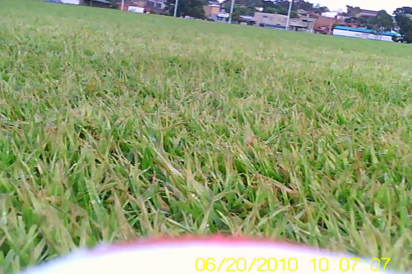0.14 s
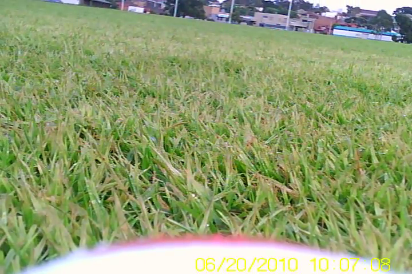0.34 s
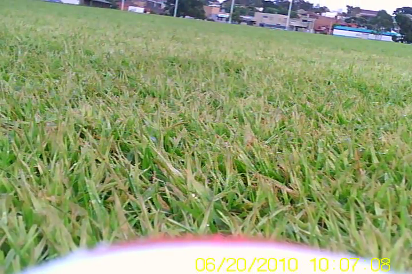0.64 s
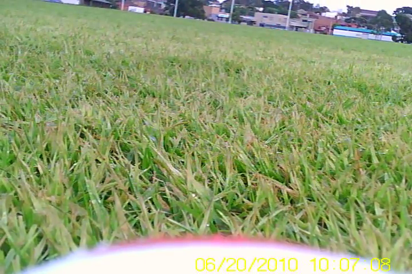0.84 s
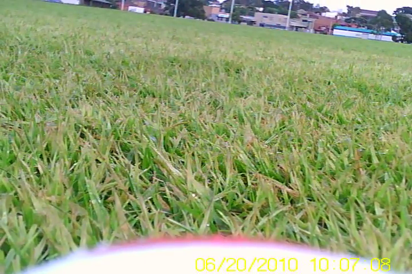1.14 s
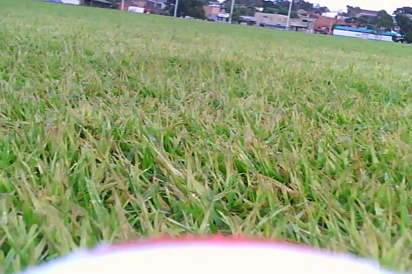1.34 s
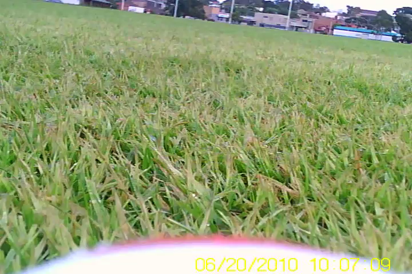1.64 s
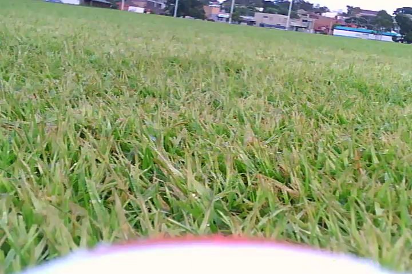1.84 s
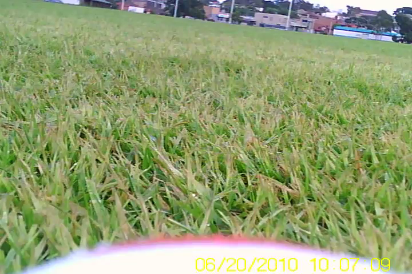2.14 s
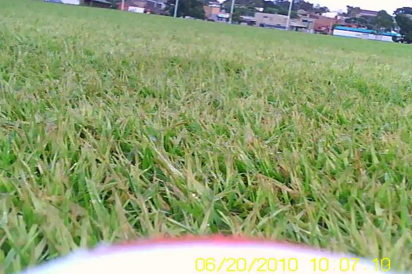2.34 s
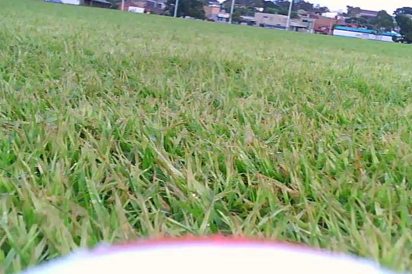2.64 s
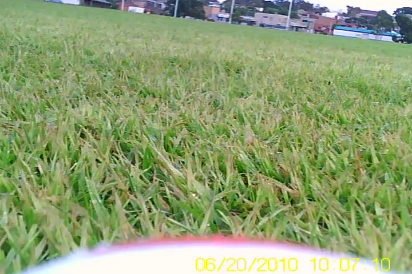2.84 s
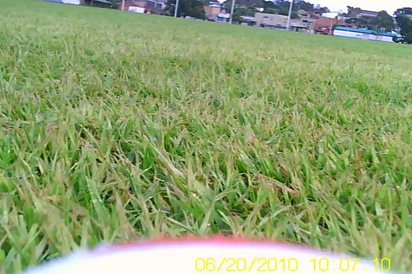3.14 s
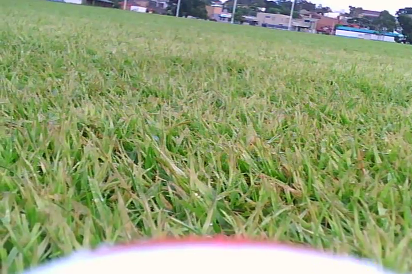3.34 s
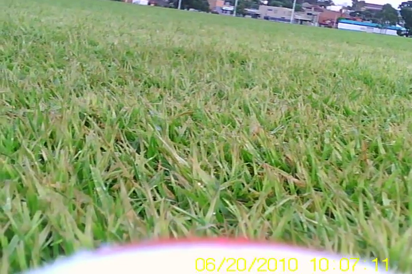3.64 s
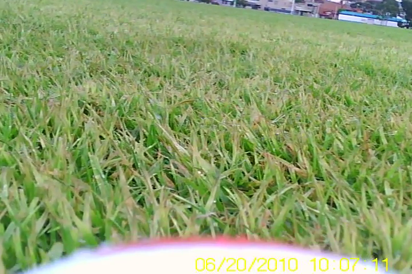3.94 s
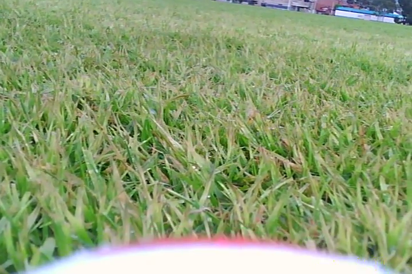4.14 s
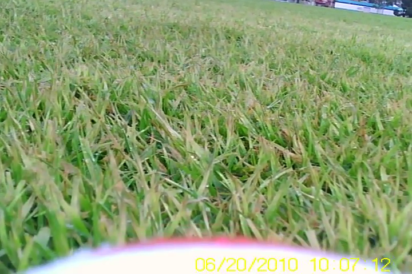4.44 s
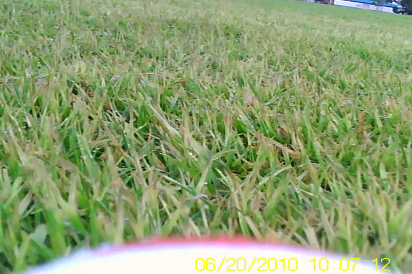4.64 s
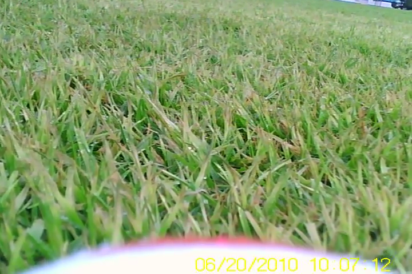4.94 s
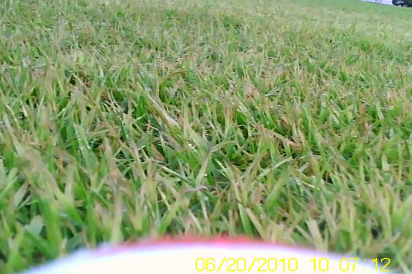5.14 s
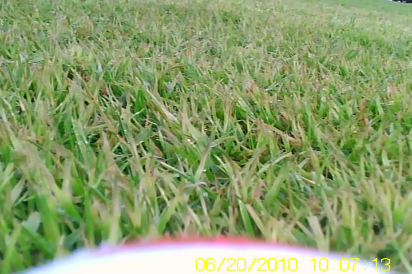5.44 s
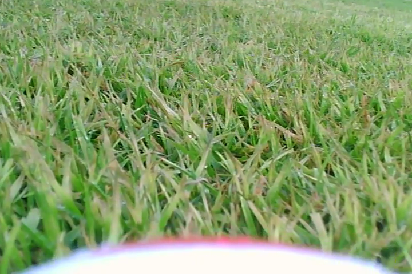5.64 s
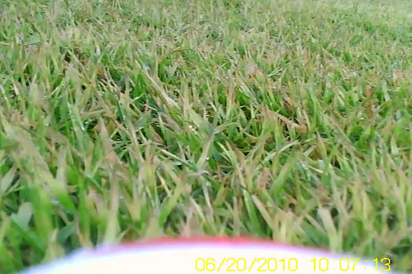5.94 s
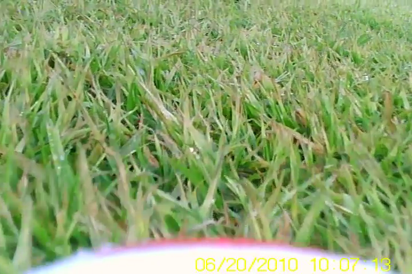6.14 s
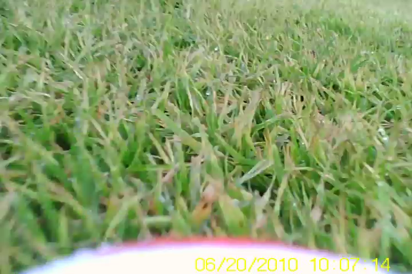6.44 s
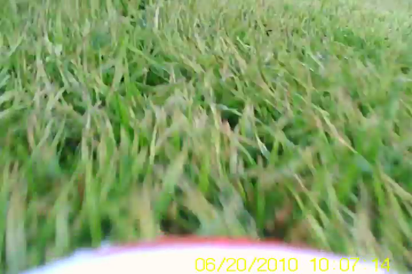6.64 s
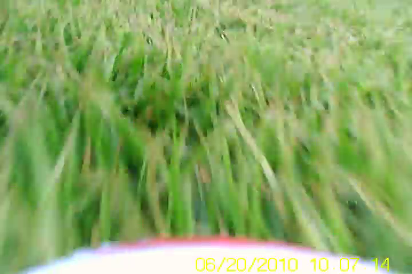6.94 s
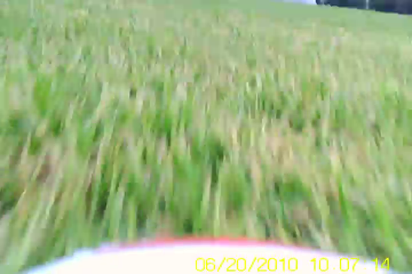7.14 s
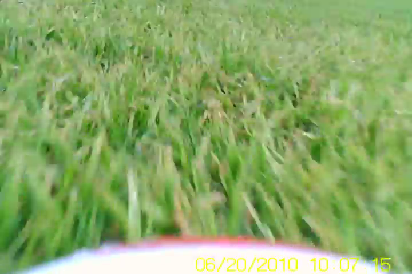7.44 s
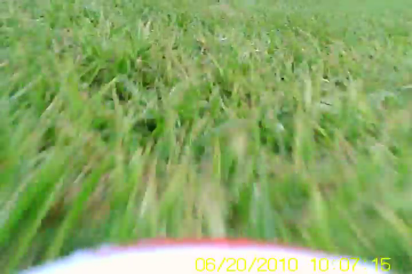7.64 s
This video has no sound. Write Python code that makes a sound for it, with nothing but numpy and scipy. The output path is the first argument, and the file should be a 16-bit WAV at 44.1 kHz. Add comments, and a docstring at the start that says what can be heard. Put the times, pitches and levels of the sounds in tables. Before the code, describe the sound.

Heard from on board a small electric model plane on a grass field: over a low rumble, servos zip and twitch in short whirrs for two seconds. After a quiet gap, the motor knocks, stutters and whines rapidly upward. The propeller builds to a hard, buzzing drone with hiss and thin high whistle, then wavers and rattles as the plane rolls off.

```python
"""A small electric model plane stands on grass, heard from on board, over a low steady rumble.
First its servos whirr and twitch as the controls are tried: gear clicks, brush rub and pinion whine.
Then the brushless motor kicks, ringing its mount, stutters and spins up with a ragged magnet whine.
The propeller's shaft orders drone through the foam airframe under the controller's thin whistle;
hiss and rattle follow the rotor, and the tones waver more as the plane rolls off."""
import sys
import numpy as np
from scipy import signal
from scipy.fft import rfft, irfft, next_fast_len
from scipy.io import wavfile

SR = 44100
rng = np.random.default_rng(int(sys.argv[2]) if len(sys.argv) > 2 else 0)


def dump(signal):
    """Clip the signal to [-1, 1] and save it as 16-bit WAV at the path in sys.argv[1]."""
    limited = np.clip(np.atleast_2d(signal).T, -1, 1)
    pcm = np.round(limited * 32767).astype(np.int16)
    wavfile.write(sys.argv[1], SR, pcm)


N = 343098
TIME = np.arange(N) / SR

# Rumble spectrum, relative: [f/Hz, level/dB]
RUMBLE_SPECTRUM = [(12, -32), (20, 4), (28, -1.5), (60, -1), (105, -5), (127, -11.5), (170, -11.5),
                   (200, -17), (380, -21), (434, -24), (471, -23), (3150, -38), (8940, -40.5), (9950, -43),
                   (12000, -63), (15600, -96), (22000, -120)]
RUMBLE_DB = -46
CUTOFF_HZ = 12200

# Servo sweeps, relative: [start t/s, end t/s, drive level/dB, gear growl level/dB, servo 0 or 1]
SERVO_SWEEPS = [(0.088, 0.194, -35, -62, 0), (0.242, 0.337, -33.5, -40.5, 0),
                (.405, 0.531, -33.5, -39.5, 0), (0.573, 0.68, -33.5, -34.5, 0), (0.793, 0.891, -36, -51, 0),
                (0.965, 1.059, -37.5, -47.5, 0), (1.165, 1.256, -37.5, -53, 0),
                (1.366, 1.439, -35.5, -47, 0), (1.762, 1.84, -37.5, -69.5, 1), (1.915, 1.991, -33, -72, 1)]
# Hardest single servo kicks, relative: [t/s, level/dB]
SERVO_TWITCHES = [(0.0947, -31), (0.2229, -32), (0.2743, -33), (0.397, -30), (0.4279, -29), (0.6835, -31.5),
                  (0.7981, -33), (0.9747, -37), (1.0326, -27), (1.2984, -34), (1.3718, -36), (1.61, -31),
                  (1.7447, -26), (1.7901, -24.5), (1.8105, -25.5), (1.8964, -29), (1.926, -25),
                  (1.9789, -23.5)]
# Servo hunts for its position, one small kick per radio frame: [start t/s, end t/s, mean level/dB]
SERVO_HUNTS = [(0.0, 0.075, -38.5), (0.196, 0.21, -38.5), (0.554, 0.56, -31), (0.766, 0.78, -35),
               (0.929, 0.96, -39), (1.074, 1.13, -42), (1.32, 1.35, -38), (1.449, 1.48, -40),
               (1.631, 1.73, -33), (1.826, 1.88, -35), (2.002, 2.055, -38.5), (2.111, 2.165, -41.5),
               (2.751, 2.805, -36)]
FRAME_S, HUNT_SCATTER_DB = .0223, 4
SECOND_SERVO_S = 1.55   # later kicks belong to servo 1
# Servo and gear growl spectra, relative: [f/Hz, level/dB]
FIRST_SERVO_SPECTRUM = [(250, -23), (720, -16), (1050, -9), (1450, -5.5), (1690, -1), (1950, -16.5),
                        (2750, -15), (3100, -26.5), (4300, -15), (5200, -21), (6200, -13.5), (7000, -23),
                        (9300, -21.5), (11200, -66)]
SECOND_SERVO_SPECTRUM = [(600, -30), (1200, -13.5), (1500, 6.5), (1750, -7), (2000, -8.5), (2750, -6.5),
                         (3200, -23.5), (5000, -16), (8000, -26.5), (9500, -34), (12000, -58)]
GROWL_SPECTRUM = [(130, -25), (220, -9.5), (330, -6.5), (420, 4.5), (560, -12), (750, -15), (1020, -0.5),
                  (1400, 2), (2000, -41)]
# Servo gear squeak as it runs down, mean course: [t/s, f/Hz, level/dB]
GEAR_SQUEAK = [(.47, 3800, -80), (.485, 3450, -57), (.5, 3150, -57), (.52, 2400, -47), (.531, 2090, -43),
               (.538, 1955, -80)]

# Starting jolts of the rotor, knock relative: [t/s, knock level/dB, switching tone level/dB]
ROTOR_JOLTS = [(2.8677, -14, -43), (2.884, -25, -70), (2.9075, -39, -56), (2.931, -21, -31),
               (2.941, -20, -33), (2.949, -19, -32), (2.955, -18.5, -39), (2.9595, -21, -38),
               (3.013, -17, -60), (3.035, -9, -60), (3.079, -10, -60)]
# Ringing of the soft motor mount, relative: [f/Hz, level/dB, t60/s]
MOUNT_RINGS = [(564, -13, 0.025), (900, -3, 0.028), (1016, -4, 0.024), (1440, -12, 0.017),
               (2060, -15, 0.013), (2650, -17, 0.022), (3450, -13, .008), (6300, -18, 0.01)]

# Rotor speed before snags and jitter: [t/s, speed/(turns/s)]
ROTOR_SPEED = [(2.93, 10), (3.02, 44), (3.07, 73), (3.13, 110.0), (3.15, 120.0), (3.21, 139.4),
               (3.32, 162.6), (3.54, 184.3), (3.67, 206.8), (3.76, 214.7), (3.95, 215.2), (4.05, 222.3),
               (4.24, 241.3), (4.55, 242.7), (4.74, 256.3), (5.23, 256.3), (5.43, 270.1), (5.59, 275.0),
               (5.68, 286.9), (5.82, 293.1), (6.19, 295.3), (6.6, 292.8), (6.81, 276.2), (6.92, 273.2),
               (6.99, 275.7), (7.35, 271.7), (7.48, 287.2), (7.68, 286.2), (7.78, 288.9)]
# Grass blades catch the propeller and brake it: [t/s, speed loss/(turns/s)]
GRASS_SNAGS = [(5.735, 1.94), (6.09, 4.9), (6.43, 1.83), (6.645, 1.7)]
SNAG_S = 0.02207
CRUISE_TURNS_PER_S = 280   # reference speed of the laws
ROLL_START_S, ROLL_BUILD_S = 5.3, 1.2   # wheels start to bump over the grass
SPEED_JITTER_STANDING, SPEED_JITTER_ROLLING = 0.001405, 0.00368   # share of speed
# Easing of the motor sounds as the plane gets rolling; each layer takes a share: [t/s, level/dB]
ROLL_EASING = [(5.56, 1), (5.64, -2.5), (6.0, -5.5), (6.6, -6.5), (6.8, -8), (7.25, -10), (7.5, -8),
               (7.78, -9.5)]
# Layer laws: [level at cruise/dB, slope/(dB per octave of speed), share of easing/1]
HISS_LAW = (-25, 16.3, 0.99)
BUZZ_LAW = (-27.5, 14.9, 0.39)
RATTLE_LAW = (-30, 7.4, 0.33)

# Hiss and airframe rattle spectra, relative: [f/Hz, level/dB]
HISS_SPECTRUM = [(300, -18), (1000, -4.5), (2500, 1), (3600, -0.5), (4300, 1), (5100, -2.5), (6200, 0),
                 (6600, -5.5), (7400, -0.5), (8000, -7), (8550, -14), (9900, -10), (11000, -15),
                 (12100, -33)]
RATTLE_SPECTRUM = [(150, -29.5), (330, -15.5), (480, -5), (620, -14), (790, -2.5), (1150, -7), (1600, 2),
                   (2200, 0.5), (2500, -5.5), (2780, -5.5), (3200, -22.5), (6000, -43.5)]
STUTTER_DB, STUTTER_END_S, STUTTER_FADE_DB_PER_S = -29, 3.14, 35   # rattle until rotor is in step
# Spells of mount rocking: [start t/s, end t/s, wobble level/dB, rattle level/dB]
ROCKING_SPELLS = [(5.42, 5.66, -34, -27), (6.679, 7.4, -41.5, -37.5), (7.377, 7.9, -43, -31)]
ROCK_RAMP_S = 0.042

# Switching tone: starts sharp and settles, weakens near full throttle
WHISTLE_HZ, WHISTLE_SHARP_HZ, WHISTLE_SETTLE_S = 8066, 125, .45
WHISTLE_DB, WHISTLE_EASING_SHARE = -31.5, 0.78   # before the full-throttle weakening
FULL_TURNS_PER_S, WHISTLE_FADE_TURNS_PER_S = 294.5, 25.6

# Fourteen magnets passing the coils, sidebands from rotor runout: [shaft order/1, relative level/dB]
MAGNET_ORDERS = [(10, -23), (11, -13.5), (12, -22), (13, -1), (14, 0), (15, -29), (16, -13.5), (18, -20),
                 (22, -21), (24, -12), (26, -7), (28, -9), (31, -16), (36, -6.5), (42, -6)]
# Course of the magnet whine, relative: [t/s, level/dB]
MAGNET_LEVEL = [(2.99, -47), (3.015, -27.5), (3.07, -14), (3.09, -22.5), (3.18, -16), (3.38, -17.5),
                (3.47, -21), (4.2, -23.5), (4.7, -50)]
# Gain of the motor mount for the magnet whine: [f/Hz, level/dB]
MOUNT_GAIN = [(300, -8), (600, -1), (900, -4), (1300, 3), (1700, -3.5), (2180, 3.5), (2380, -13.5),
              (2780, -6.5), (3100, -31), (3700, -30), (5000, -55)]
COG_ROUGH_DB, COG_SETTLE_S = 6.5, 0.23   # ragged at first, then smoother

# Propeller tones before body gain: [shaft order/1, level at cruise/dB, slope/(dB per octave), flutter factor/1]
BLADE_TONES = [(1, -29.3, 3.5, 1.22), (2, -10.5, 26, 0.85), (4, -21.5, 10.5, 1.43), (6, -28.5, 13.5, 0.87),
               (8, -33.5, 14.5, 2.33)]
BLADE_EASING_SHARE = 0.46
# Wing and fuselage resonances for the propeller tones: [f/Hz, level/dB]
BODY_GAIN = [(120, -6), (205, 2.5), (240, -1.0), (290, -1.8), (430, -6), (485, -15.5), (515, -7.5),
             (590, -8), (690, 4.8), (830, -5), (880, -1), (1150, -1.1), (1300, -2.5), (1450, 3.5),
             (1550, 10.5), (1700, 15.5), (2050, 13), (2300, 3.1)]
# Sharp edge of each blade pass: [shaft order/1, relative level/dB]
BLADE_EDGE_ORDERS = [(12, 0.5), (14, 0.5), (16, -1), (18, -4.5), (20, -4), (22, -9), (24, -11), (26, -13),
                     (28, -10)]
# Course of the blade edge, relative: [t/s, level/dB]
EDGE_LEVEL = [(3.3, -68), (3.8, -48), (4.2, -40.5), (5.3, -43), (6.5, -47), (7.2, -42.5), (7.48, -38.5),
              (7.78, -41)]
# Radiation of the blade edge: [f/Hz, level/dB]
EDGE_GAIN = [(2500, -8), (3300, 0.5), (3650, -1.5), (4050, 2.5), (4500, -4), (5000, -4.5), (8000, 0)]
# Weaker shaft orders: [shaft order/1, relative level/dB]
SHAFT_BUZZ_ORDERS = [(3, 4.5), (5, -0.5), (7, -4), (9, -4), (10, 0.5), (11, -12), (12, 3), (13, -1),
                     (15, -16), (17, -7)]
# Airframe gain for the buzz: [f/Hz, level/dB]
AIRFRAME_GAIN = [(300, -6), (600, -1.5), (900, -8), (1300, -1.5), (1700, 2.5), (2180, 1.5), (2380, -9.5),
                 (2780, -8), (3100, -22.5), (4200, -21), (6000, -32), (8000, -23), (9000, -40)]
# Half orders, mount rocking once in two turns: [shaft order/1, relative level/dB]
HALF_ORDERS = [(.5, -11.5), (1.5, -8), (2.5, 1.5), (3.5, -1), (4.5, -1.5), (5.5, 2), (6.5, -19)]
FLUTTER_STANDING, FLUTTER_ROLLING = 0.072, .15   # share of tone level, before each flutter factor
BUZZ_FLUTTER_STANDING, BUZZ_FLUTTER_ROLLING = 0.31, 0.52


def from_db(db):
    """Decibels to gain."""
    return 10 ** (np.asarray(db) / 20)


def rms_one(x):
    """Scale to unit power."""
    return x / np.sqrt(np.mean(x ** 2) + 1e-20)


def in_time(rows):
    """Each column of a curve table, interpolated per sample."""
    s, *columns = np.transpose(rows)
    return [np.interp(TIME, s, c) for c in columns]


def at_hz(points, hz):
    """Gain of a spectrum at the given frequencies, linear in dB over log f."""
    freqs, db = np.transpose(points)
    return from_db(np.interp(np.log(np.maximum(hz, 1)), np.log(freqs), db))


def fade_in(start_s, length_s):
    """Linear ramp, 0 to 1."""
    return np.clip((TIME - start_s) / length_s, 0, 1)


def drift(rate_hz):
    """Smooth random signal of spread 1, changing about rate_hz times a second."""
    pole = np.exp(-40 * np.pi * rate_hz / SR)
    noise = rng.standard_normal(N // 20 + 4002)   # one value per 20 samples
    slow = signal.lfilter([1], [1, -2 * pole, pole * pole], noise)[4000:]
    return np.interp(np.arange(N) / 20, np.arange(len(slow)), rms_one(slow))


def angle_of(hz):
    """Running angle in radians of something that turns hz times a second."""
    return 2 * np.pi * np.cumsum(hz) / SR


def coloured(x, spectrum):
    """Minimum-phase filter with the given spectrum and a treble roll-off; white noise keeps its power."""
    size = 2 * next_fast_len(N // 2 + 4096)
    hz = np.fft.rfftfreq(size, 1 / SR)
    gain = rms_one(at_hz(spectrum, hz) / np.hypot(1, (hz / CUTOFF_HZ) ** 16))
    # folding the cepstrum makes the filter causal
    cepstrum = irfft(np.log(gain))
    cepstrum[1:size // 2] *= 2
    cepstrum[size // 2 + 1:] = 0
    return irfft(rfft(x, size) * np.exp(rfft(cepstrum)))[:N]


def blips(times_s, peaks_db, rise_s, t60_s):
    """Envelope that jumps at each time and dies away."""
    out, age = np.zeros(N), TIME[:SR // 8]
    shape = (1 - np.exp(-age / rise_s)) * from_db(-60 * age / t60_s)
    for s, db in zip(times_s, peaks_db):
        at = max(int(s * SR), 0)
        out[at:at + len(age)] += from_db(db) * shape / shape.max()
    return out


def on_the_roll(standing, rolling):
    """Value moving from its standing to its rolling size as the plane sets off."""
    return standing + (rolling - standing) * fade_in(ROLL_START_S, ROLL_BUILD_S)


def rotor_speed():
    """Turns per second: throttle course, brief snags, and jitter that grows on the roll."""
    turns, = in_time(ROTOR_SPEED)
    braking = sum(loss * np.exp(-((TIME - s) / SNAG_S) ** 2) for s, loss in GRASS_SNAGS)
    jitter = on_the_roll(SPEED_JITTER_STANDING, SPEED_JITTER_ROLLING) * drift(14)
    return (turns - braking) * (1 + jitter)


def by_speed(law, turns):
    """Level in dB of a layer that grows with rotor speed and eases once the plane rolls."""
    db, db_per_octave, share = law
    easing_db, = in_time(ROLL_EASING)
    return db + db_per_octave * np.log2(turns / CRUISE_TURNS_PER_S) + share * easing_db


def rocking():
    """Gains of the wobble and of the extra rattle while the mount rocks."""
    wobble, rattle = np.zeros(N), np.zeros(N)
    for start, end, wobble_db, rattle_db in ROCKING_SPELLS:
        spell = fade_in(start, ROCK_RAMP_S) - fade_in(end - ROCK_RAMP_S, ROCK_RAMP_S)
        wobble += from_db(wobble_db) * spell
        rattle += from_db(rattle_db) * spell
    return wobble, rattle


def rumble():
    """Low steady rumble: noise through a fixed spectrum."""
    return from_db(RUMBLE_DB) * coloured(rng.standard_normal(N), RUMBLE_SPECTRUM)


def servo_kicks():
    """Times and levels of all kicks: the hard ones, and uneven runs at the frame rate."""
    kicks = list(SERVO_TWITCHES)
    for start, end, db in SERVO_HUNTS:
        for s in np.arange(start, end, FRAME_S):
            kicks.append((s, db + HUNT_SCATTER_DB * rng.standard_normal()))
    return np.transpose(kicks)


def gear_train(mesh_hz, scatter_db, rub, whine):
    """Uneven clicks of teeth rattling in their play, brush rub and fast pinion whine; unit power."""
    angle = angle_of(mesh_hz)
    tooth = np.diff(np.floor(angle / (2 * np.pi)), prepend=0)
    flank = rng.choice([-1, 1], N)   # a loose tooth lands on either flank
    clicks = tooth * flank * from_db(scatter_db * np.clip(rng.standard_normal(N), -2, 2))
    pinion = sum(from_db(3 * drift(40)) * np.sin(k * angle) for k in (2, 4, 6))
    catching = from_db(2.4 * drift(94))   # gears bind and free themselves
    return rms_one(catching * (rms_one(clicks) + rub * rng.standard_normal(N) + whine * rms_one(pinion)))


def case_ring(x, hz=1680, width_hz=120, boost_db=0.0):
    """The servo case adds a narrow ring to whatever shakes it."""
    return x + from_db(boost_db) * signal.lfilter(*signal.iirpeak(hz, hz / width_hz, fs=SR), x)


def servos(top_mesh_hz=1800, throb=0.061, roundness=.45, twitch_db=-9, first_db=-3.0):
    """Each sweep speeds the gears up and slows them; the drive throbs at the radio's frame rate."""
    drive, growl, speed = np.zeros((2, N)), np.zeros(N), np.zeros(N)
    for start, end, db, growl_db, which in SERVO_SWEEPS:
        progress = np.clip((TIME - start) / (end - start), 0, 1)
        arc = np.abs(np.sin(np.pi * progress)) ** roundness
        drive[int(which)] += from_db(db) * arc
        growl += from_db(growl_db) * arc ** 2
        speed += arc
    drive *= 1 + throb * np.sin(angle_of((1 + 0.021 * drift(5.2)) / FRAME_S))

    times_s, kick_db = servo_kicks()
    kicks = blips(times_s, kick_db + twitch_db, rise_s=0.0019, t60_s=0.067)
    second = TIME > SECOND_SERVO_S
    mesh_hz = top_mesh_hz * (1 + speed) / 2 * from_db(.35 * drift(50))
    teeth = gear_train(mesh_hz, scatter_db=4, rub=1.0, whine=0.28)

    first_drive = from_db(first_db) * np.hypot(drive[0], kicks * ~second)
    second_drive = np.hypot(drive[1], kicks * second)
    first_servo = case_ring(coloured(teeth * first_drive, FIRST_SERVO_SPECTRUM))
    second_servo = coloured(teeth * second_drive, SECOND_SERVO_SPECTRUM)
    return first_servo + second_servo + coloured(teeth * growl, GROWL_SPECTRUM)   # gears growl under load


def squeak(overtone_db=-5):
    """A dry gear sings a falling note with its octave."""
    hz, db = in_time(GEAR_SQUEAK)
    angle = angle_of(hz * (1 + .015 * drift(150)))
    sounding = (TIME > GEAR_SQUEAK[0][0]) & (TIME < GEAR_SQUEAK[-1][0])
    note = np.sin(angle) + from_db(overtone_db) * np.sin(2 * angle)
    return np.sqrt(2) * sounding * from_db(db + 2 * drift(120)) * note


def jolts(contact_s=0.00067, ring_db=-1.0, crack_db=-13):
    """Current pulses jerk the rotor, ring the soft mount and shake the airframe with a dry crack."""
    rings, age = np.zeros(N), TIME[:SR // 8]
    for s, knock_db, tone_db in ROTOR_JOLTS:
        at = int(s * SR)
        for hz, db, t60_s in MOUNT_RINGS:
            level = from_db(knock_db + db + rng.normal(0, 2.2) - 60 * age / t60_s)
            ring = level * np.sin(2 * np.pi * hz * age + rng.uniform(0, 2 * np.pi))
            rings[at:at + len(age)] += ring * (1 - np.exp(-age / contact_s))
    times_s, knock_db, tone_db = np.transpose(ROTOR_JOLTS)
    crack = blips(times_s, knock_db + crack_db, rise_s=0.00048, t60_s=0.016) * rng.standard_normal(N)
    return from_db(ring_db) * rings + coloured(crack, RATTLE_SPECTRUM)


def rush(turns, angle, rocking_rattle, idle_hiss_db=-54, chop=0.24, clatter=0.37):
    """Hiss chopped by each blade, and the airframe rattling with each turn."""
    wash = np.hypot(from_db(by_speed(HISS_LAW, turns)), from_db(idle_hiss_db))
    hiss = wash * from_db(0.52 * drift(30)) * fade_in(2.925, 0.031)
    hiss *= 1 + chop * np.cos(2 * angle)   # two blades
    stutter = from_db(STUTTER_DB - STUTTER_FADE_DB_PER_S * np.maximum(TIME - STUTTER_END_S, 0))
    shaking = np.sqrt(from_db(by_speed(RATTLE_LAW, turns)) ** 2 + rocking_rattle ** 2 + stutter ** 2)
    rattle = shaking * from_db(1.7 * drift(41)) * fade_in(2.93, 0.027)
    rattle *= 1 + clatter * np.cos(angle)
    hiss_noise = coloured(hiss * rng.standard_normal(N), HISS_SPECTRUM)
    return hiss_noise + coloured(rattle * rng.standard_normal(N), RATTLE_SPECTRUM)


def controller(turns, angle, jitter_rad=0.4, ripple=0.11):
    """Coils sing at the switching rate, in bursts at first, then steadily with a ripple each turn."""
    easing_db, = in_time(ROLL_EASING)
    times_s, knock_db, tone_db = np.transpose(ROTOR_JOLTS)
    settling = np.exp(-np.maximum(TIME - times_s[0], 0) / WHISTLE_SETTLE_S)
    wander_hz = 6 * drift(25) + 6 * drift(1)
    hz = WHISTLE_HZ + WHISTLE_SHARP_HZ * settling + wander_hz
    chopping = np.clip((FULL_TURNS_PER_S - turns) / WHISTLE_FADE_TURNS_PER_S, .1, 1)
    steady = from_db(WHISTLE_DB + WHISTLE_EASING_SHARE * easing_db) * chopping * fade_in(2.958, 0.0089)
    bursts = blips(times_s, tone_db, rise_s=0.00048, t60_s=0.022)
    tone = np.sin(angle_of(hz) + jitter_rad * drift(69))
    return np.sqrt(2) * (steady + bursts) * (1 + ripple * np.cos(angle)) * tone


def magnets(turns, angle):
    """Magnet pull swells once a turn, raggedly at first, and sweeps up through the mount's resonances."""
    level_db, = in_time(MAGNET_LEVEL)
    rough_db = COG_ROUGH_DB * np.exp(-np.maximum(TIME - MAGNET_LEVEL[0][0], 0) / COG_SETTLE_S)
    whine = np.zeros(N)
    for k, db in MAGNET_ORDERS:
        lag = np.pi * (k > 20) * rng.uniform(0, 2)   # overtones out of step with the main tone
        ragged = from_db(rough_db * np.tanh(drift(79)))
        whine += from_db(db) * ragged * at_hz(MOUNT_GAIN, k * turns) * np.cos(k * angle + lag)
    return np.sqrt(2) * fade_in(2.96, .03) * from_db(level_db) * whine


def partial(order, angle, flutter):
    """One shaft order, wavering in level and phase as the blades meet uneven air."""
    phase = order * angle + rng.uniform(0, 2 * np.pi)
    in_phase = (1 + flutter * drift(24.8)) * np.cos(phase)
    quadrature = flutter * drift(21.6) * np.sin(phase)
    return np.sqrt(2 / (1 + 2 * flutter ** 2)) * (in_phase + quadrature)


def propeller(turns, angle, wobble_gain):
    """Blade tones with a sharp edge, airframe-shaped buzz, and half orders when the mount rocks."""
    flutter = on_the_roll(FLUTTER_STANDING, FLUTTER_ROLLING)
    buzz_flutter = on_the_roll(BUZZ_FLUTTER_STANDING, BUZZ_FLUTTER_ROLLING)
    edge_db, = in_time(EDGE_LEVEL)
    tones, edge, buzz, wobble = np.zeros((4, N))
    for k, db, slope, loose in BLADE_TONES:
        level = from_db(by_speed((db, slope, BLADE_EASING_SHARE), turns))
        tones += level * at_hz(BODY_GAIN, k * turns) * partial(k, angle, flutter * loose)
    for k, db in BLADE_EDGE_ORDERS:
        edge += from_db(db) * at_hz(EDGE_GAIN, k * turns) * partial(k, angle, flutter=0.32)
    for k, db in SHAFT_BUZZ_ORDERS:
        buzz += from_db(db) * at_hz(AIRFRAME_GAIN, k * turns) * partial(k, angle, buzz_flutter)
    for k, db in HALF_ORDERS:
        wobble += from_db(db) * partial(k, angle, flutter=0.41)
    buzz_gain = from_db(by_speed(BUZZ_LAW, turns))
    return fade_in(3.05, 0.093) * (tones + from_db(edge_db) * edge + buzz_gain * buzz + wobble_gain * wobble)


def scene():
    """One rotor speed drives the running motor's sounds; rumble, servos and jolts are added."""
    turns = rotor_speed()
    angle = angle_of(turns)
    wobble_gain, rocking_rattle = rocking()
    motor = rush(turns, angle, rocking_rattle) + controller(turns, angle)
    motor += magnets(turns, angle) + propeller(turns, angle, wobble_gain)
    return (rumble() + servos() + squeak() + jolts() + motor)[None]


def record(dry):
    """Steep elliptic low-pass cuts the top of the treble."""
    return signal.sosfilt(signal.ellip(11, .2, 95, CUTOFF_HZ, fs=SR, output="sos"), dry)


dry = scene()
out = record(dry)
dump(out)
```